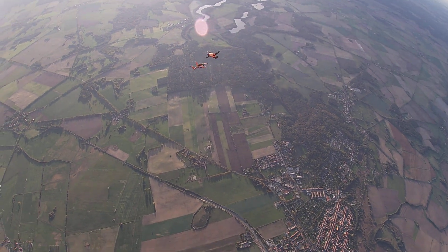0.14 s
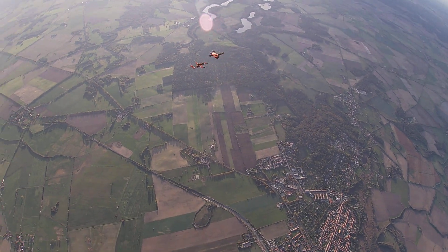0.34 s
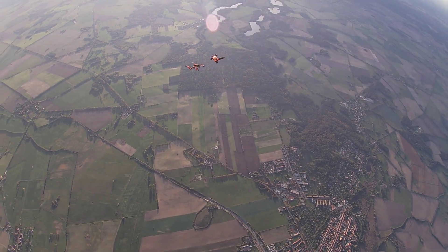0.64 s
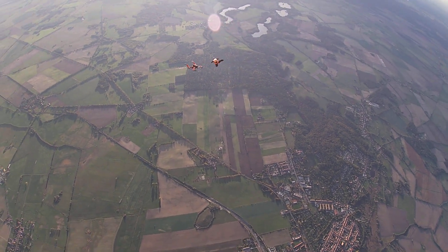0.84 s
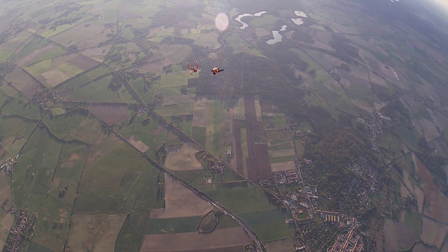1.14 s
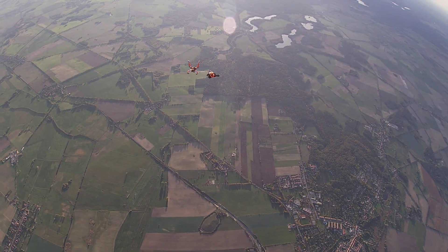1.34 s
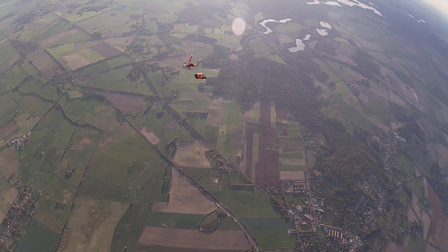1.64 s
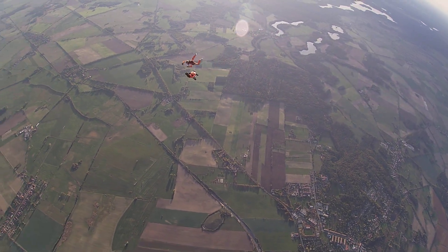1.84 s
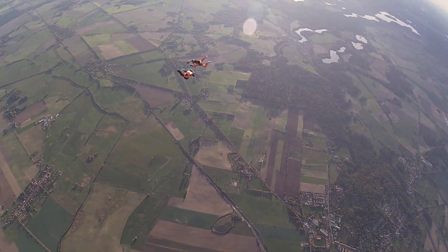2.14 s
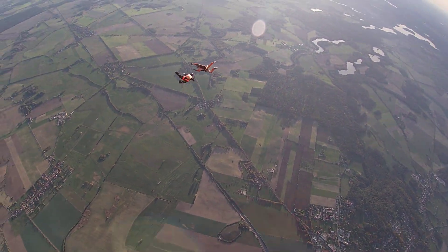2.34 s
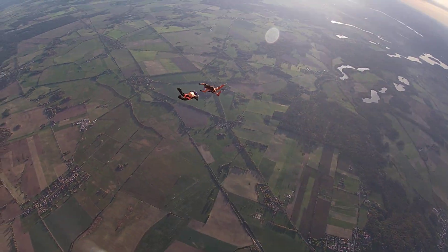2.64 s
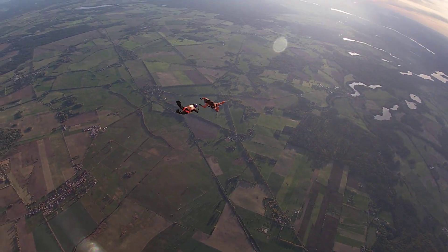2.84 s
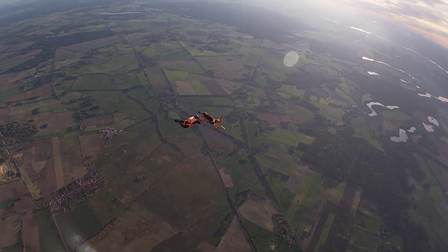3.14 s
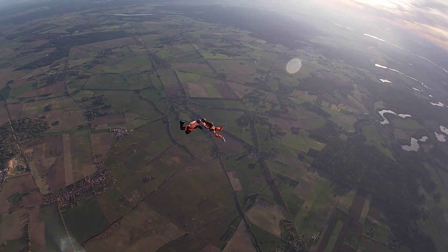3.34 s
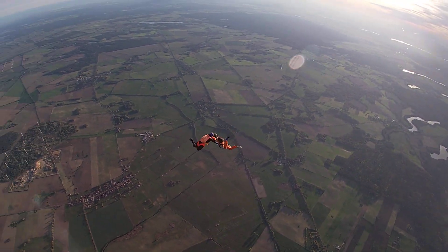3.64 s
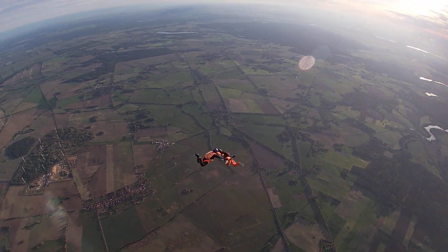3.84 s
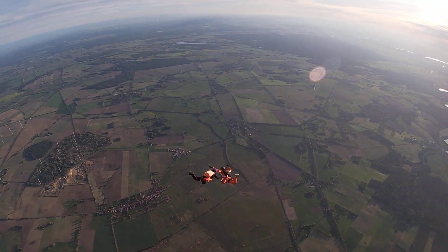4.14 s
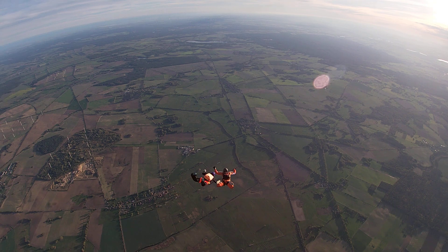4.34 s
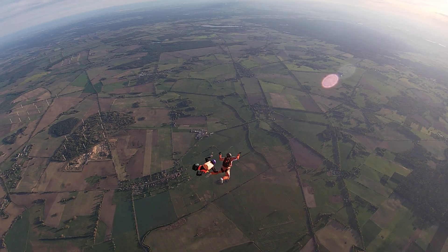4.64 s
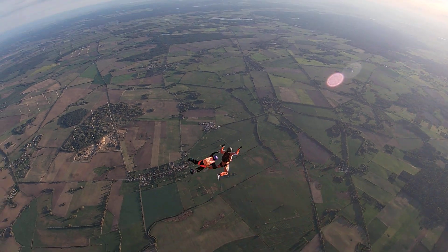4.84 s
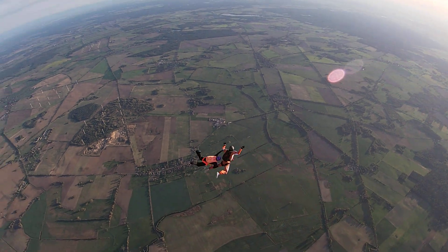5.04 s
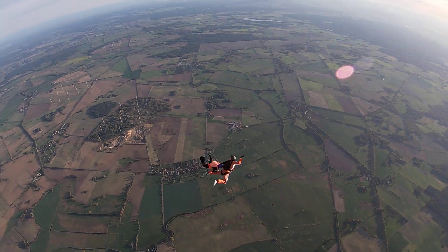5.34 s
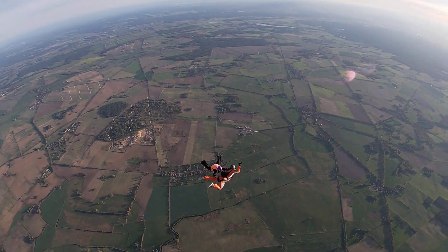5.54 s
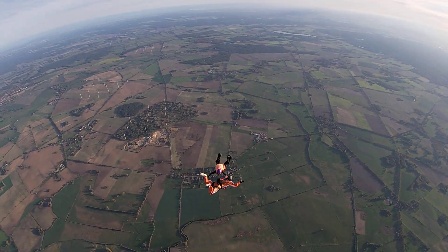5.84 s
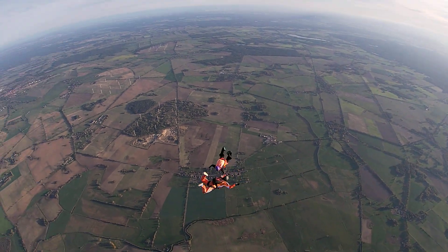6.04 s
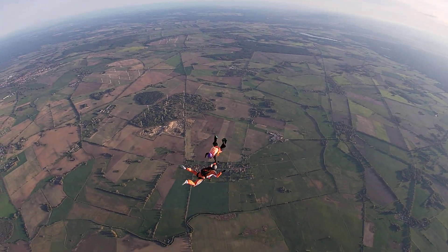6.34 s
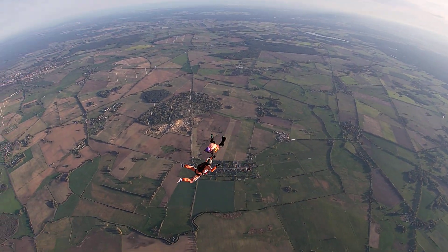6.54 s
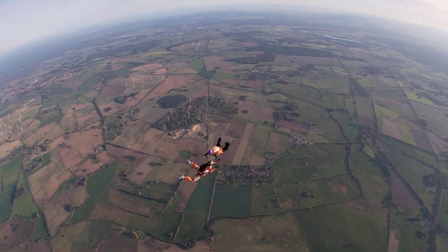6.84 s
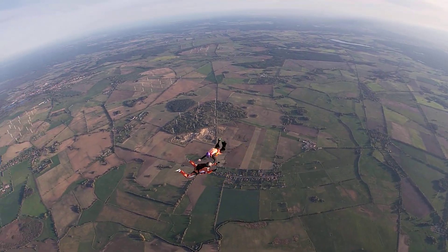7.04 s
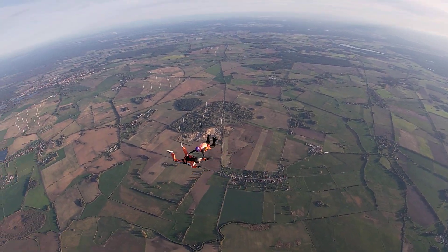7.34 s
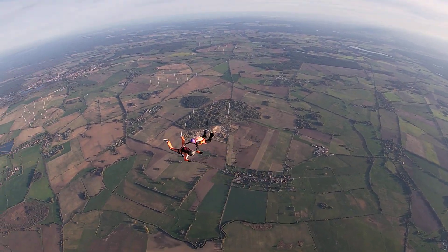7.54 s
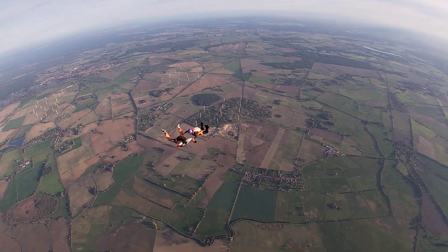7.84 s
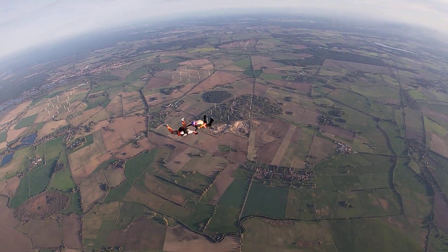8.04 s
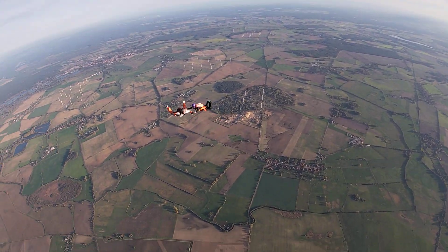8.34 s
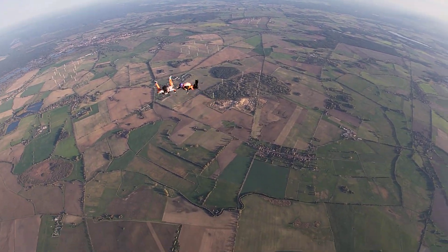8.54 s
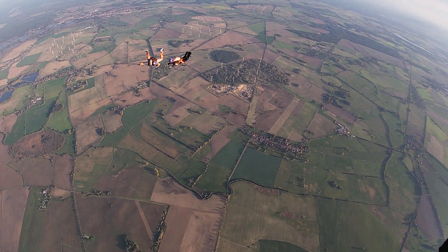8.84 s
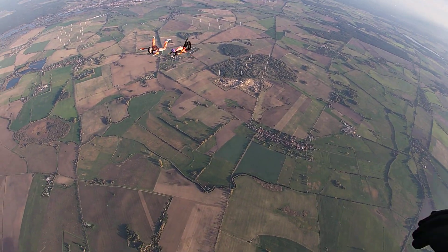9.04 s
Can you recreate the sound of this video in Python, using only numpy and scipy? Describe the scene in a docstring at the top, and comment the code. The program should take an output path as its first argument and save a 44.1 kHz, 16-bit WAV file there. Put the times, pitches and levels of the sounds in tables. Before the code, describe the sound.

Loud wind in free fall presses directly on a skydiver's helmet camera, dry and close, without echo. Throughout, deep buffeting and a rough, jittering low drone underlie turbulent air. From 0 to 3 s a grainy, crackling roar with fluttering gusts carries scattered dull slaps, the low buffeting heaviest near 2.3 s; slaps cluster around 2.8-3.1 s as the roar peaks. Near 3-4 s a broad whoosh sweeps by and the roar drops, leaving the drone stronger and wavering in pitch. It rises again near 4.7 s, then thins to smoother hiss until 6 s. At 6.1-6.5 s abrupt flaps and a heavy gust burst in, then a hissy lull around 6.8 s. From 7 to 7.7 s flapping and slaps return. The drone pulses unevenly around 8 s; from 8.5 s a whoosh, hard thumps and strong roar last until the end at 9.2 s.

```python
"""The wake of a skydiver's helmet in free fall buffets the microphone of a small camera: deep noise.
Vortices peel off the housing as a jittering drone centred between 118 and 178 Hz.
Flow on the port swings between a smooth hiss and a crackling roar as the head turns, both bands of
noise; gusts, flaps and slaps of air are shaped noise too. A limiter holds the peaks."""
import sys
import numpy as np
from scipy import signal
from scipy.fft import rfft, irfft
from scipy.io import wavfile
from scipy.ndimage import uniform_filter1d, minimum_filter1d

SR = 44100
rng = np.random.default_rng(int(sys.argv[2]) if len(sys.argv) > 2 else 0)


def int16_out(signal):
    """Quantize to a 16-bit WAV file."""
    q = np.round(np.clip(np.atleast_2d(signal).T, -1, 1) * 32767)
    wavfile.write(sys.argv[1], SR, q.astype(np.int16))


N = 405277
TIME_S = np.arange(N) / SR
BINS_HZ = np.fft.rfftfreq(N, 1 / SR)
EDGE_HZ = 12600  # top of the recorded band
FLUTTER_DB = -21.5  # large eddies that flutter over the port all the time
ROAR_FLAP_DB, ROAR_FLAP_DB_PER_DB = 0.15, 0.17  # flapping at full roar; more per dB below it

# Spectra of the layers. Each row: frequency in Hz, relative level in dB.
BUFFET_COLOUR = [(5, -11), (20, -1.5), (35, -6.5), (55, 1), (80, -0.5), (120, -2.5), (250, -32), (700, -86)]
LARGE_EDDY_COLOUR = [(100.0, -39), (200.0, 4), (270.0, 1), (380.0, -6.5), (500.0, -13.5), (1200.0, -39.5),
                     (4000.0, -88)]
SMALL_EDDY_COLOUR = [(150.0, -19), (400.0, 4.5), (650.0, 1.1), (1500.0, -8), (2200.0, -17), (3500.0, -21.5),
                     (6000.0, -43), (12000.0, -77.5)]
HISS_COLOUR = [(300.0, -16.5), (800.0, -5), (1400.0, 2), (3100.0, 0), (4000.0, -6.5), (5000.0, -12),
               (6500.0, -22), (9000.0, -43.5), (14000.0, -80)]
FIZZ_COLOUR = [(2000.0, -15.5), (4000.0, 2), (5300.0, -3.5), (10000.0, -26), (12500.0, -39.5)]
CRACKLE_COLOUR = [(200, -17), (550, 6.5), (1000, 1), (1600, -3), (3500, -12), (5000, -26), (8000, -59),
                  (12000, -79.5)]
SLAP_COLOUR = [(150, -14.5), (450, 9), (1500, 1), (3200, -9), (5000, -20), (8000, -48.5), (12000, -70)]
FLAP_COLOUR = [(150, -18.5), (450, 9.5), (900, 4), (1700, 2), (3200, -21), (5000, -32.5), (9000, -65)]
# Air sweeps across the rim as the head turns. Each row: crest in seconds, length in seconds,
# level in dB, pitch in Hz.
SWEEPS = [(2.9, 0.76, -36.5, 1700), (3.67, 0.59, -35, 1600), (4.75, 3.1, -38, 1400),
          (6.38, 0.37, -37, 1950), (6.62, 0.51, -44, 2750), (8.35, 0.17, -35.5, 2080),
          (8.48, 0.35, -31.5, 1850)]
# Brief flaps of air across the port. Each row: crest in seconds, length in seconds, level in dB.
FLAPS = [(2.76, 0.083, -34), (3.06, .14, -34), (6.1, 0.043, -25), (6.185, 0.12, -26.5), (6.28, .04, -29),
         (6.42, 0.073, -31), (6.487, 0.06, -30), (6.594, 0.05, -30.5), (6.905, 0.049, -31),
         (6.996, 0.027, -30), (7.17, 0.15, -33), (7.269, 0.051, -28.5), (7.377, 0.23, -30),
         (7.54, 0.08, -32), (8.092, 0.038, -35)]
# Sharp slaps of air on the port. Each row: start in seconds, peak in dB, treble corner in Hz.
SLAPS = [(0.424, -14, 2700), (.54, -9.5, 2000), (0.611, -14, 3200), (.891, -12, 1300), (1.160, -12.5, 1400),
         (1.349, -12.5, 1550), (1.436, -20, 1200), (1.883, -14.5, 3200), (2.146, -10, 1570),
         (2.745, -15, 2200), (2.864, -15, 2700), (3.04, -18, 3200), (3.088, -9, 1550), (6.097, -17.5, 1500),
         (6.229, -10, 800), (6.398, -11.5, 1500), (6.954, -15, 2720), (6.992, -15.5, 2490),
         (7.193, -9, 2000), (7.364, -10.5, 1100), (7.409, -10, 850), (7.632, -11.5, 1100),
         (8.100, -16, 1400), (8.576, -11.5, 1500), (8.629, -6.5, 950), (9.009, -12, 1200),
         (9.169, -21, 1800)]
# Surges of large eddies. Each row: crest in seconds, length in seconds, level in dB, pitch in Hz.
SURGES = [(.02, 0.29, -21.5, 340), (.24, .06, -22, 383), (.45, 0.44, -24, 387), (.95, 0.25, -24.5, 325),
          (1.8, 4.4, -22, 299), (4.8, 0.32, -25.5, 288), (5.92, 0.42, -22.5, 220), (6.1, 0.2, -19, 314),
          (6.22, 0.1, -13.5, 255), (6.29, 0.055, -20, 277), (6.45, 0.19, -24.5, 304),
          (7.25, 0.47, -21.5, 290), (7.55, 0.72, -18.5, 277), (7.78, 0.072, -17.5, 245),
          (8.7, 0.59, -15.5, 248), (9.1, 0.73, -18, 267)]
# Roar of small eddies when the port faces the flow; layers are offset from this curve.
# Each row: time in seconds, level in dB.
ROAR = [(0, -28.5), (.46, -27.5), (1.2, -28), (1.62, -30), (2.2, -27), (2.94, -25), (3.11, -25),
        (3.16, -28), (3.24, -24.5), (3.64, -26.5), (4.14, -35), (4.72, -28), (4.98, -31.5), (5.15, -35.5),
        (5.6, -38), (6.04, -39), (6.08, -30), (6.43, -31.5), (6.8, -42.5), (7.2, -28.5), (7.68, -28),
        (7.97, -36.5), (8.27, -34), (8.5, -26), (9.0, -24), (9.19, -25.5)]
# Smooth flow along the housing. Each row: time in seconds, level in dB.
HISS = [(0.0, -42.5), (0.6, -40.5), (1.7, -41.5), (2.82, -38.5), (3.18, -40.5), (3.62, -37), (4.91, -37),
        (5.17, -44), (5.39, -38), (6.66, -36), (6.89, -43.5), (7.08, -38), (7.25, -45.5), (7.57, -38.5),
        (7.73, -41), (7.88, -37.5), (8.55, -37), (9.19, -38)]
# Treble fizz. Each row: time in seconds, level relative to the hiss in dB.
FIZZ = [(0.0, -4.5), (1.37, -5.5), (1.52, -8.5), (2.17, -6), (3.73, -7.5), (3.9, -15.0), (5.0, -13),
        (6.06, -13.5), (6.15, -37), (6.35, -14), (6.6, -23), (6.84, -6), (7.13, -22), (7.81, -20.5),
        (8.57, -9), (8.61, -15), (9.19, -8)]
# Deep buffeting of the wake. Each row: time in seconds, level in dB.
BUFFET = [(0, -19.5), (1.28, -18), (1.43, -23), (2.2, -17), (2.36, -15.5), (2.5, -21), (3.7, -26),
          (4.6, -24.5), (4.8, -22.5), (5.6, -20), (5.95, -32.5), (7.1, -23.5), (7.55, -29.5), (7.78, -23),
          (8.3, -21.5), (9.19, -22)]
# Vortex shedding. Each row: time in seconds, central rate in Hz, level in dB.
SHEDDING = [(0, 125, -16), (.65, 122, -15.5), (.93, 120, -18), (1.05, 132, -16.5), (1.5, 122, -15),
            (2.35, 118, -17), (2.7, 132, -14), (3.45, 121, -15), (3.8, 135, -13.5), (4.12, 120, -12),
            (4.24, 168, -13.5), (4.37, 128, -13.5), (4.49, 172, -13.5), (4.67, 130, -14), (4.92, 174, -13),
            (5.25, 136, -16), (5.6, 124, -15.5), (5.87, 148, -12.5), (6.3, 150, -14), (6.55, 170, -13.5),
            (6.8, 145, -14.5), (7.12, 158, -12.5), (7.5, 135, -15), (7.76, 140, -16.5), (7.9, 145, -12.5),
            (8.0, 145, -19), (8.16, 155, -12), (8.23, 150, -21.5), (8.31, 148, -12.5), (8.6, 155, -15),
            (8.9, 176, -14), (9.19, 178, -12.5)]


def gain_of(db):
    """Amplitude factor of a level in dB."""
    return 10 ** (np.asarray(db) / 20)


def evened(x):
    """Scales x to rms 1."""
    return x / np.sqrt(np.mean(x ** 2) + 1e-20)


def follow(rows, column=1):
    """One column of a curve table, interpolated to every sample."""
    columns = np.transpose(rows)
    return np.interp(TIME_S, columns[0], columns[column])


def coloured(x, colour):
    """Weights x by a spectrum, at rms 1."""
    hz, db = np.transpose(colour)
    weight_db = np.interp(np.log(BINS_HZ + 1), np.log(hz), db)
    return evened(irfft(rfft(x) * gain_of(weight_db), N))


def wander(rate_hz):
    """Smooth random curve of rms 1; its spectrum falls off above rate_hz."""
    rolloff = 1 / np.sqrt(1 + (BINS_HZ / rate_hz) ** 4)
    return evened(irfft(rfft(rng.standard_normal(N)) * rolloff, N))


def bursty(field, depth_db):
    """Noise whose strength follows a field of turbulence."""
    return rng.standard_normal(N) * gain_of(depth_db * field)


def steadied(x, hold_s):
    """Holds the strength of x near 1 over spans longer than hold_s; quicker lurches stay."""
    size = int(hold_s * SR)
    power = uniform_filter1d(uniform_filter1d(x ** 2, size), size)
    return evened(x / np.sqrt(power + 1e-9))


def swell(crest_s, length_s, db):
    """Gain of a gust that rises to a crest and falls again."""
    phase = np.clip((TIME_S - crest_s) / length_s, -.5, .5)
    return gain_of(db) * np.cos(np.pi * phase) ** 2


def rushes(rows, air, spread, hold_s):
    """Each gust rushes in a band around its own pitch: the smaller its eddies, the higher."""
    out = np.zeros(N)
    for crest_s, length_s, db, pitch_hz in rows:
        edges_hz = [pitch_hz / spread, pitch_hz * spread]
        band = signal.butter(3, edges_hz, "bandpass", fs=SR, output="sos")
        rush = steadied(signal.sosfilt(band, air), hold_s)
        out += swell(crest_s, length_s, db) * rush
    return out


def rim_whoosh():
    """Air sweeping over the rim swells and fades as a broad rush in the upper middle range."""
    air = bursty(wander(rate_hz=160), depth_db=2)
    return rushes(SWEEPS, air, spread=1.47, hold_s=.08)


def flaps():
    """The flow briefly catches the port and lets go: swells of bursty noise."""
    noise = bursty(wander(rate_hz=200), depth_db=1.5)
    air = steadied(coloured(noise, FLAP_COLOUR), hold_s=0.019)
    return sum(swell(*row) for row in FLAPS) * air


def slaps(rise_s=0.0017):
    """Single strong eddies hit the port: low-passed puffs that die in a few milliseconds."""
    out = np.zeros(N)
    t_s = TIME_S[:SR // 50]
    envelope = (t_s * np.exp(-t_s / rise_s)) ** 2
    air = coloured(rng.standard_normal(N), SLAP_COLOUR)
    for start_s, peak_db, top_hz in SLAPS:
        start = round(start_s * SR)
        span = slice(start, start + len(t_s))
        puff = signal.lfilter(*signal.butter(2, top_hz, fs=SR), air[span] * envelope)
        out[span] += gain_of(peak_db) * puff / abs(puff).max()
    return out


def crackle(per_s, spread_db, length_s):
    """Scattered tiny eddies of uneven strength, each a short puff of noise."""
    strikes = rng.random(N) < per_s / SR
    sizes = gain_of(spread_db * np.minimum(rng.exponential(1, N), 2)) * strikes
    puffs = signal.oaconvolve(sizes, np.hanning(int(length_s * SR)), "same")
    return coloured(puffs * rng.standard_normal(N), CRACKLE_COLOUR)


def port_flow():
    """Turbulence in millisecond bursts within gusts, shared by surges, roar, hiss and fizz."""
    roar_db, hiss_db, fizz_db = follow(ROAR), follow(HISS), follow(FIZZ)
    gusts = wander(rate_hz=30)
    field = np.minimum(evened(wander(rate_hz=160) + 0.59 * gusts), 2.6)

    flutter = gain_of(FLUTTER_DB) * coloured(rng.standard_normal(N), LARGE_EDDY_COLOUR)
    surges = rushes(SURGES, bursty(field, depth_db=3.5), spread=1.433, hold_s=0.054)

    # slower lumps of the wake flap the roar and flicker the fizz, more the weaker each is
    flap_depth_db = ROAR_FLAP_DB + ROAR_FLAP_DB_PER_DB * (roar_db.max() - roar_db)
    flapping_db = flap_depth_db * wander(rate_hz=13)
    flicker_db = (0.61 + 0.11 * (fizz_db.max() - fizz_db)) * wander(rate_hz=9)

    roar = coloured(bursty(field, depth_db=1.0), SMALL_EDDY_COLOUR)
    roar = gain_of(roar_db + flapping_db + 0.84) * roar
    hiss = gain_of(hiss_db) * coloured(bursty(field, depth_db=2.0), HISS_COLOUR)
    fizz = coloured(bursty(field, depth_db=1.5), FIZZ_COLOUR)
    fizz = gain_of(hiss_db + fizz_db + flicker_db) * fizz
    crackling = crackle(per_s=140, spread_db=2.5, length_s=0.0022)
    crackling = gain_of(roar_db - 8.0) * crackling
    return flutter + surges + roar + hiss + fizz + crackling


def drone(shed_hz, width_hz, drift, drift_hz, steadiness):
    """Vortices peel off at a rate that jitters and meanders; their strength saturates."""
    swirl = (wander(width_hz) + 1j * wander(width_hz)) / np.sqrt(2)
    swirl = swirl / np.sqrt(1 + abs(steadiness * swirl) ** 2)
    log_drift = drift * wander(drift_hz) + .07 * wander(rate_hz=7.07)
    turns = np.cumsum(shed_hz * np.exp(log_drift)) / SR
    return evened((swirl * np.exp(2j * np.pi * turns)).real)


def wake():
    """Deep pressure swings under the drone of shed vortices, each on its own level curve."""
    shed_hz, drone_db = follow(SHEDDING, column=1), follow(SHEDDING, column=2)
    buffet = steadied(coloured(rng.standard_normal(N), BUFFET_COLOUR), hold_s=0.18)
    vortices = drone(shed_hz, width_hz=41.7, drift=.17, drift_hz=51.0, steadiness=0.41)
    vortices = steadied(vortices, hold_s=0.047)
    return gain_of(follow(BUFFET)) * buffet + gain_of(drone_db) * vortices


def scene():
    """All of the air at the one microphone."""
    return (rim_whoosh() + flaps() + slaps() + port_flow() + wake())[None]


def limited(x, ceiling_db, hold_s):
    """Turns the gain down smoothly around each peak that nears or passes the ceiling."""
    size = int(hold_s * SR)
    allowed = (1 + (abs(x) / gain_of(ceiling_db)) ** 8) ** (-1 / 8)
    return x * uniform_filter1d(minimum_filter1d(allowed, size), size)


def record(dry):
    """The limiter, then a steep low-pass at the band edge."""
    held = limited(dry, ceiling_db=-1.5, hold_s=.006)
    padded = np.pad(held, ((0, 0), (255, 255)), "reflect", reflect_type="odd")
    low_pass = signal.firwin(511, EDGE_HZ, window=("kaiser", 9), fs=SR)
    return signal.oaconvolve(padded, low_pass[None], "valid")


dry = scene()
out = record(dry)
int16_out(out)
```